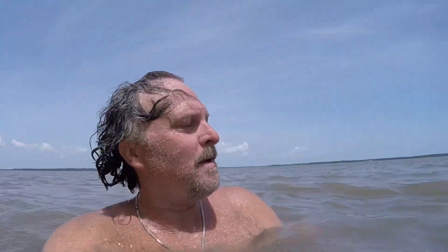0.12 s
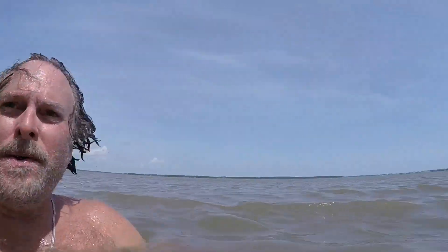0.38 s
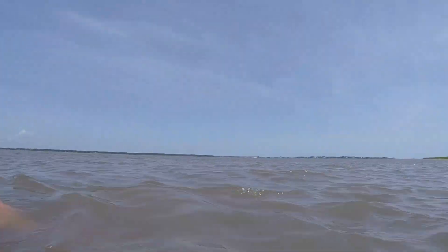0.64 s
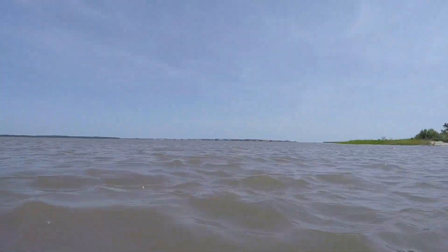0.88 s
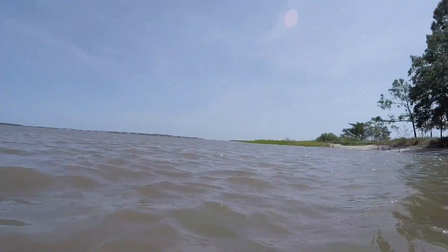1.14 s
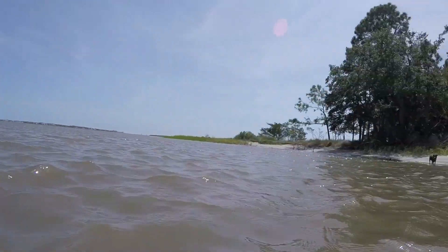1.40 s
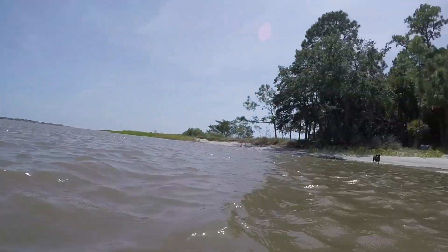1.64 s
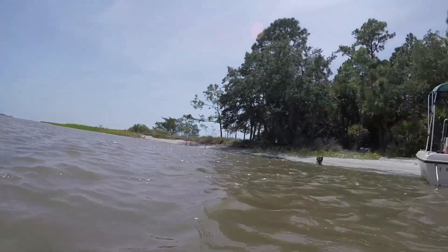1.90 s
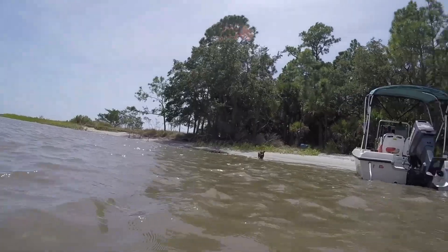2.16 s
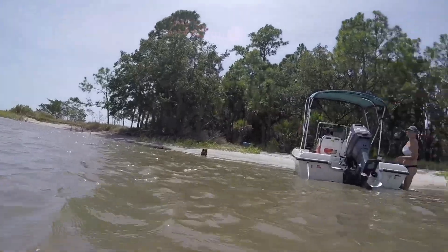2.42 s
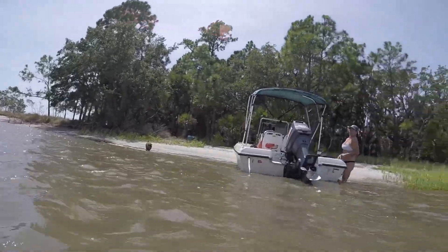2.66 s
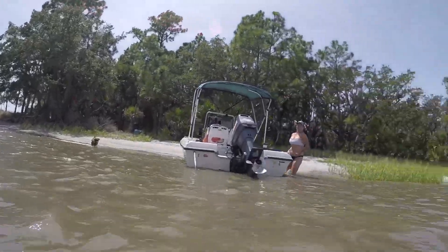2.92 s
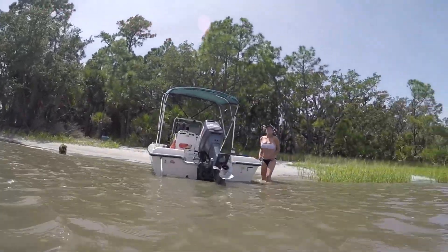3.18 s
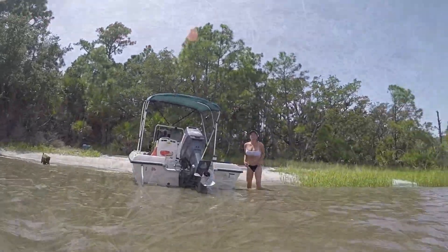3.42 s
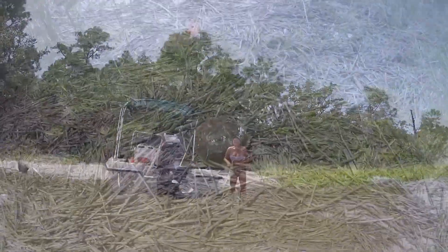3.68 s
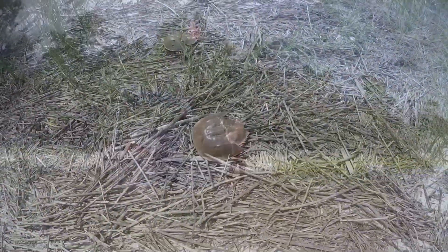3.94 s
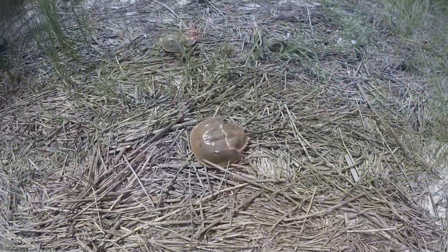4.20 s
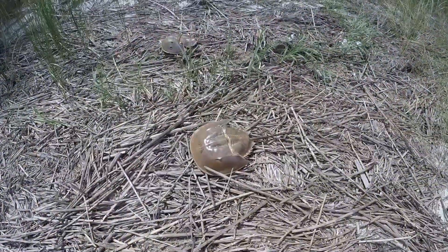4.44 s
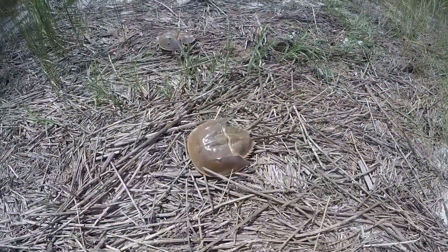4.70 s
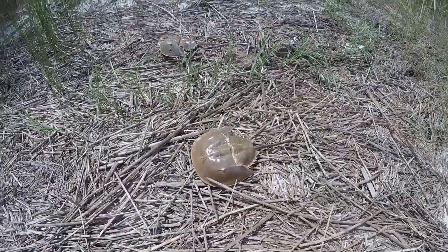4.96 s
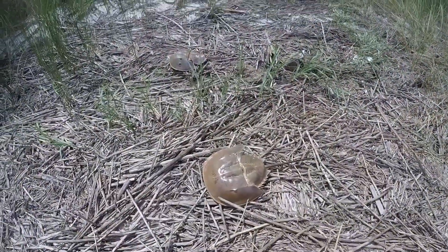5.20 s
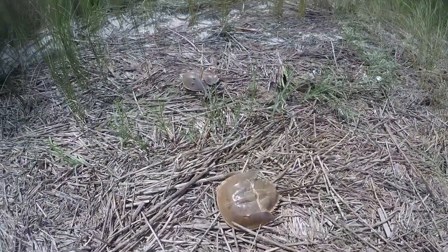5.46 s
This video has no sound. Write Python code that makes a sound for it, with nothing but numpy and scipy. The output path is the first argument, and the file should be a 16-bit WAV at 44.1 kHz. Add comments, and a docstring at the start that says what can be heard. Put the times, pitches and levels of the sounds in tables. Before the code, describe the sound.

A camera in a closed plastic case is held just above shallow water on a breezy shore. Two hard knocks and a small splash come early, then drops plink over grainy lapping while an insect chirps rapidly. Wind rumble swells in the middle, with another heavy knock just after three seconds and more drips. After a sharp click at about four seconds, water and insect drop away, leaving faint hiss and soft low rumble.

```python
"""A breezy shore: a small camera in a closed plastic case is hand-held over shallow water.
Wind rumble and flutter are resonant noise; fingers knock the case (ringing modes) and shove the
diaphragm (filtered pulses); cracks and small bright ticks are brief rough noises. Splashes, soft low
bursts and faint whistles are swells of filtered noise; drops are gliding plinks with spatter. An insect
chirps in gated noise bands on the bank, and lapping water is a grainy wash of coloured noise."""
import sys
import numpy as np
from scipy import signal
from scipy.fft import rfft, irfft, next_fast_len
from scipy.io import wavfile
from scipy.ndimage import uniform_filter1d

SR = 44100
rng = np.random.default_rng(int(sys.argv[2]) if len(sys.argv) > 2 else 0)


def wav_out(sig):
    """Save sig, one row per channel (or a flat mono array), as 16-bit PCM at SR to the path in sys.argv[1]."""
    wavfile.write(sys.argv[1], SR, np.round(np.clip(np.atleast_2d(sig).T, -1, 1) * 32767).astype(np.int16))


def linear_from_db(decibels):
    """Turn decibels (scalar or array-like) into linear amplitude factors; 0 gives 1."""
    return 10 ** (np.asarray(decibels, float) / 20)


N = 246512


def level(x, db):
    """Scale to an rms level."""
    return x * linear_from_db(db) / np.sqrt(np.mean(x ** 2))


def curve(table):
    """Columns of a time table, interpolated to one value per sample."""
    time_s, *columns = np.transpose(table)
    return [np.interp(np.arange(N) / SR, time_s, column) for column in columns]


def coloured(points):
    """Noise with the spectrum given as (Hz, dB) points, rms 1."""
    hz, db = np.transpose(points)
    bins_hz = np.maximum(np.arange(N // 2 + 1) * SR / N, 1)
    gain_db = np.interp(np.log(bins_hz), np.log(hz), db, left=-90, right=-90)
    return level(irfft(rfft(rng.standard_normal(N)) * linear_from_db(gain_db), N), 0)


def band(x, hz, width_hz):
    """Two-pole resonance, gain 1 at the centre."""
    return signal.lfilter(*signal.iirpeak(min(hz, .45 * SR), hz / width_hz, fs=SR), x)


def low(x, hz):
    """Two-pole low-pass."""
    return signal.lfilter(*signal.butter(2, min(hz, .45 * SR), fs=SR), x)


def walk(rate_hz):
    """Random levels held 1 / rate_hz s and slewed twice; rms 1."""
    hold = int(SR / rate_hz)
    steps = np.repeat(rng.standard_normal(N // hold + 1), hold)
    return level(uniform_filter1d(uniform_filter1d(steps, hold), hold)[:N], 0)


def add(out, start_s, x):
    """Mix x into out from start_s on."""
    i = max(int(start_s * SR), 0)
    out[i:i + len(x)] += x[:N - i]


def swell(middle_s, spread_s):
    """A bell-shaped rise and fall around middle_s: its first sample's time and its shape."""
    t = max(middle_s - .16, 0) + np.arange(SR // 3) / SR
    return t[0], np.exp(-.5 * ((t - middle_s) / spread_s) ** 2)


def bursts(table, widest_hz):
    """Swells of noise, each through one resonance no wider than its centre or widest_hz."""
    out = np.zeros(N)
    noises = rng.standard_normal((len(table), SR // 3))
    for (middle_s, spread_s, level_db, hz), noise in zip(table, noises):
        start_s, shape = swell(middle_s, spread_s)
        width_hz = min(hz, widest_hz)
        resonant = band(band(noise, hz, width_hz), hz, 2 * width_hz)
        add(out, start_s, shape * level(resonant, level_db))
    return out


def wind():
    """Eddies push the diaphragm to and fro at a wavering slow rate; gusty flutter rides above."""
    # wind on the microphone: time_s, rumble_gain_db, flutter_db
    wind_levels = [(0.0, -42, -54), (.14, -32, -53.5), (.43, -31, -59), (.65, -32.5, -71),
                   (1.0, -36.5, -67.5), (1.5, -34.5, -57), (1.78, -29.5, -55), (1.87, -22.5, -64),
                   (1.94, -28.5, -67), (2.0, -20.5, -71), (2.13, -41, -63), (2.29, -30, -59.5),
                   (2.5, -25, -59), (2.63, -27, -51), (2.68, -24.5, -56), (2.85, -30.5, -55),
                   (3.11, -26, -44.5), (3.22, -19.5, -46), (3.29, -29.5, -52), (3.38, -18, -59),
                   (3.45, -32.5, -54), (3.52, -23, -56), (3.59, -33, -66), (3.69, -27, -52),
                   (3.95, -36, -54), (4.3, -36.5, -59.5), (4.8, -35, -68), (5.1, -39.5, -59.5),
                   (5.59, -42, -64)]
    rumble_hz, rumble_width_hz, flutter_hz = 32.3, 14.9, 87
    buffet_db, buffets_per_s = 2.5, 20
    rumble_gain_db, flutter_db = curve(wind_levels)
    eddies = band(low(rng.standard_normal(N), 82.0), rumble_hz, rumble_width_hz)
    # the swing keeps a fairly even size, so that the gusts set its loudness
    size = np.abs(signal.hilbert(eddies, next_fast_len(N))[:N])
    evened = eddies / (size + 0.59 * size.mean()) ** 0.35
    rumble = level(linear_from_db(buffet_db * walk(buffets_per_s)) * evened, 0)
    gusts = linear_from_db(4 * walk(14))
    flutter = gusts * band(low(low(rng.standard_normal(N), 165), 260), flutter_hz, 50)
    return low(low(linear_from_db(rumble_gain_db) * rumble, 49.4), 152) + linear_from_db(flutter_db) * level(flutter, 0)


def shoves():
    """The vented diaphragm, a damped second-order high-pass, follows a push, then overshoots back."""
    # shoves that swing the diaphragm: start_s, gain_db, push time constant_s, signed factor
    pushes = [(0.2331, -32, 0.0018, -1.1), (0.264, -17.5, .0021, 0.82), (3.1361, -8.5, 0.00061, 1),
              (4.1239, -20.5, 0.0011, -1.1)]
    diaphragm_hz, diaphragm_damp = 45.3, 0.82
    out, t, w = np.zeros(N), np.arange(SR // 8) / SR, 2 * np.pi * diaphragm_hz
    vented = signal.bilinear([1, 0, 0], [1, diaphragm_damp * w, w * w], SR)
    for start_s, gain_db, rise_s, factor in pushes:
        push = (t / rise_s) ** 2 * np.exp(-t / rise_s)
        swing = signal.lfilter(*vented, push)
        add(out, start_s, factor * linear_from_db(gain_db) * swing / np.abs(swing).max())
    return out


def knocks():
    """A short blow rings the case's damped modes; the grip shortens the ring."""
    # modes of the free case: mode_hz, gain_db, t60_s
    modes = [(456, -12, 0.034), (607, -6.5, 0.054), (890, -5, 0.088), (1196, 3, 0.016), (1930, 2.5, 0.069),
             (2100, -2, 0.043), (2590, 3.5, 0.016), (2737, 3, 0.027), (2960, -12, 0.029),
             (4010, 1.5, 0.044), (4480, 1.5, 0.045), (5100, -22, .022), (6000, 3.5, .025),
             (6700, -5, 0.017), (7700, -6, .017)]
    # knocks and bounces: start_s, peak_db, contact_s, grip damping_per_s
    blows = [(0.2333, -26, 0.000027, 30), (0.2345, -14, 0.000096, 77), (0.2626, -17, 0.000062, 30),
             (0.2639, -5.5, 0.00011, 66), (0.2651, -8.5, 0.00033, 34), (3.1329, -18, 0.00024, 190),
             (3.134, -10, 0.00076, 100), (4.1236, -22, 0.000049, 49)]
    out, t = np.zeros(N), np.arange(SR // 8) / SR
    ring = sum(linear_from_db(db) * np.sin(2 * np.pi * hz * t) * 1000 ** (-t / t60_s) for hz, db, t60_s in modes)
    for start_s, peak_db, contact_s, grip_per_s in blows:
        # a softer finger pushes longer and wakes fewer high modes
        push = t ** 2 * np.exp(-2 * t / contact_s)
        body = signal.fftconvolve(push, ring * np.exp(-grip_per_s * t))[:len(t)]
        add(out, start_s, linear_from_db(peak_db) * body / np.abs(body).max())
    return out


def cracks_and_ticks():
    """Cracks and small bright ticks: brief rough noises that start at once and stop short."""
    # cracks and ticks: start_s, gain_db, centre_hz, length_s
    snaps = [(0.2323, -31, 4520, 0.0024), (.2627, -25.5, 4000, 0.0023), (.6404, -52, 10000, .0015),
             (1.685, -48, 9000, 0.0017), (3.1332, -22.5, 2310, 0.0025), (3.2472, -43.5, 5700, 0.0028),
             (4.0, -57.5, 5800, 0.0044), (4.1151, -31.5, 2100, 0.0026), (4.1257, -15.5, 2680, 0.0015),
             (4.1232, -20, 5100, 0.002), (4.1238, -23.5, 9700, 0.0013)]
    out, t = np.zeros(N), np.arange(SR // 50) / SR
    noises = rng.standard_normal((len(snaps), 2 * len(t)))
    for (start_s, gain_db, hz, length_s), noise in zip(snaps, noises):
        rough = band(noise, hz, 0.22 * hz)[len(t):]  # past the filter's build-up
        snap = np.tanh(2 * level(rough, 0)) * np.exp(-(t / length_s) ** 2)
        add(out, start_s, linear_from_db(gain_db) * low(low(snap, 2.06 * hz), 2.06 * hz))
    return out


def splashes():
    """A swell of dense spray: a core at the case's port, a duller slosh and a fine fizz."""
    # splashes: middle_s, spread_s, gain_db, top_hz
    sprays = [(.291, 0.02, -43, 6400), (1.794, .01, -51.5, 7500), (2.671, 0.015, -56.5, 5100),
              (3.371, .011, -49.5, 14900), (3.521, 0.0078, -58.5, 4100), (3.83, 0.014, -54.5, 12500),
              (3.841, .013, -44, 4830), (3.963, 0.0084, -47.5, 5530), (4.011, 0.0081, -58, 4100)]
    slosh_db, fizz_db = -5, -4  # relative to the core
    out = np.zeros(N)
    noises = rng.standard_normal((len(sprays), 4, SR // 3))
    for (middle_s, spread_s, gain_db, top_hz), noise in zip(sprays, noises):
        start_s, shape = swell(middle_s, spread_s)
        grain = linear_from_db(3 * level(low(noise[3], 400), 0))
        core = level(band(band(noise[0], 2050, 460), 2590, 1100), 0)
        slosh = level(band(noise[1], 870, 1050), slosh_db)
        fizz = level(band(noise[2], 2800, 4600), fizz_db)
        spray = level(grain, 0) * (core + slosh + fizz)
        add(out, start_s, linear_from_db(gain_db) * shape * low(low(spray, top_hz), top_hz))
    return out


def drops():
    """A drop on the case gives a short plink that glides up, and a noisy spatter."""
    # drops: start_s, gain_db, starting pitch_hz, spatter_db relative to gain, spatter_hz
    plinks = [(0.468, -48, 3020, -4, 3090), (0.587, -44, 2800, 0, 1500), (0.6393, -33, 2110, -10.5, 3370),
              (1.0998, -57, 1150, 7, 3040), (1.6594, -46, 2100, -7, 3430), (1.6859, -39, 2030, -5.5, 2880),
              (1.7534, -47, 2100, -9, 3370), (1.9031, -47, 1760, -8, 3030), (1.955, -55, 1080, 4, 4130),
              (2.135, -38.5, 1960, -26, 4720), (2.6582, -39.5, 2100, -21, 3510),
              (2.854, -48, 1360, -7, 4490), (2.9776, -43, 2050, -15, 3860), (3.247, -40, 2350, 1.5, 2580),
              (3.481, -46, 2430, -7, 6330), (3.549, -41, 2280, -26, 2980), (3.636, -34.5, 2270, -13, 2760),
              (3.659, -34.5, 2230, -8, 2740), (3.687, -47, 2200, -1, 1190), (3.802, -45.5, 1160, 0, 2100),
              (3.925, -51, 2170, -2, 3500)]
    t60_s = 0.023
    out, t = np.zeros(N), np.arange(SR // 25) / SR
    fade = np.minimum(t / 0.0015, 1) ** 2 * 1000 ** (-t / t60_s)
    noises = rng.standard_normal((len(plinks), len(t)))
    for (start_s, gain_db, pitch_hz, spatter_db, spatter_hz), noise in zip(plinks, noises):
        wet = band(band(noise, spatter_hz, 0.32 * spatter_hz), spatter_hz, 1.3 * spatter_hz)
        plink = np.sin(2 * np.pi * pitch_hz * t * (1 + 4 * t))
        add(out, start_s, linear_from_db(gain_db) * fade * (plink + level(wet, spatter_db)))
    return out


def insect():
    """Each chirp is a few wing strokes that rasp in four bands, each chirp in its own balance."""
    # rasp of the wings: centre_hz, width_hz, level_db
    wings = [(6400, 720, -15), (7330, 630, -16.5), (8130, 610, -20), (9000, 750, -21.5)]
    # the song as the camera turns: time_s, gain_db, extra gain of the lowest band_db
    song = [(0, -58, 2), (.3, -49.5, -4), (.55, -58.5, 2), (.75, -50, -6), (1.1, -63.5, 1),
            (1.6, -53.5, -5), (1.9, -59, 0), (2.25, -52, -14), (2.55, -51.5, -3), (2.75, -55, -3),
            (3.0, -51.5, 4), (3.35, -50, 7.5), (3.65, -54.5, 5), (3.9, -66, 6)]
    # even runs of chirps, the beat shifting between them: start_s
    runs_s = [.008, .105, .861, 1.621, 2.043, 2.586, 3.016, 3.341, 3.461]
    song_end_s, chirp_gap_s, chirp_s = 3.95, .1103, 0.047
    stroke_hz, scatter_spread_db = 96, 3.5
    gates, (song_db, lower_db) = np.zeros((len(wings), N)), curve(song)
    t = np.arange(int(chirp_s * SR)) / SR
    strokes = np.abs(np.sin(np.pi * stroke_hz * t)) ** .6
    gate = signal.windows.tukey(len(t), .2) * strokes
    ends_s = list(runs_s[1:]) + [song_end_s]
    starts_s = np.concatenate([np.arange(first_s, end_s - chirp_gap_s / 2, chirp_gap_s)
                               for first_s, end_s in zip(runs_s, ends_s)])
    scatters_db = scatter_spread_db * rng.standard_normal((len(starts_s), len(wings)))
    for start_s, scatter_db in zip(starts_s, scatters_db):
        i = int(start_s * SR)
        for row, db in zip(gates, song_db[i] + scatter_db + (lower_db[i], 0, 0, 0)):
            add(row, start_s, gate * linear_from_db(db))
    rasp = [level(band(band(band(rng.standard_normal(N), hz, width_hz), hz, width_hz), hz, 2 * width_hz), db)
            for hz, width_hz, db in wings]
    return (gates * rasp).sum(axis=0)


def soft_bursts():
    """Low thuds and gurgles: brief soft bursts, each in one band, from wind buffets, handling or water."""
    # soft bursts: middle_s, spread_s, level_db, centre_hz
    thuds = [(.105, 0.0099, -60, 580), (.145, 0.0053, -44, 126), (1.692, 0.0077, -60, 198),
             (2.551, 0.019, -57.5, 247), (2.675, 0.0089, -52, 303), (2.86, 0.0093, -52, 290),
             (2.979, 0.011, -53.5, 198), (3.138, 0.0026, -37, 493), (3.146, 0.0094, -50, 870),
             (3.376, 0.021, -54.5, 275), (3.441, 0.023, -61, 358), (3.52, 0.013, -57.5, 357),
             (3.72, 0.016, -48, 360), (3.85, 0.018, -64, 480), (3.963, 0.0077, -52.5, 990),
             (4.451, 0.0072, -63, 200), (4.73, 0.009, -56, 147), (5.171, 0.011, -54.5, 115)]
    return bursts(thuds, widest_hz=190)


def whistles():
    """A narrow band of air noise swells and fades, faint and breathy."""
    # whistles: middle_s, spread_s, level_db, centre_hz
    breaths = [(.05, 0.067, -58.5, 1894), (5.03, 0.011, -66.5, 1100), (5.18, 0.067, -68.5, 1440)]
    return bursts(breaths, widest_hz=120)


def wash():
    """Countless small ripples merge into a grainy wash, coloured by the case."""
    # lapping water all around: time_s, level_db
    wash_levels = [(0.0, -60), (0.47, -58.5), (0.86, -64.5), (1.17, -61.5), (1.6, -65), (2.33, -60.5),
                   (2.9, -62.5), (3.33, -58), (3.78, -65.5), (4.09, -76), (4.7, -84), (4.93, -72.5),
                   (5.59, -91)]
    # spectrum of the wash: frequency_hz, density_db
    wash_colour = [(300, -2), (600, -6), (1100, -3.5), (1500, -3.5), (1900, 2), (2300, 0.5), (3000, -12),
                   (4200, -11.5), (6000, -14.5), (9000, -24)]
    grain = linear_from_db(walk(30) + 1.5 * walk(150))
    return linear_from_db(curve(wash_levels)[0]) * level(grain * coloured(wash_colour), 0)


def scene():
    """Everything reaches the one microphone."""
    brief = shoves() + knocks() + cracks_and_ticks() + soft_bursts()
    water = splashes() + drops() + wash()
    return (wind() + brief + water + insect() + whistles())[None]


def low_pass(x):
    """Removes everything above the highest recorded frequency."""
    return signal.sosfilt(signal.butter(12, 16540, fs=SR, output="sos"), x)


def record(dry):
    """The microphone cuts the top; the preamplifier adds its hiss."""
    # spectrum of the hiss: frequency_hz, density_db
    hiss_colour = [(100, -7), (160, 1), (300, -4), (600, -9.5), (1200, -12), (2500, -12.5), (5000, -16),
                   (9000, -21), (13500, -23), (15200, -29), (16000, -48)]
    mic_top_hz, hiss_db = 15300, -64
    heard = signal.sosfilt(signal.ellip(8, .2, 50, mic_top_hz, fs=SR, output="sos"), dry)
    return low_pass(heard + level(coloured(hiss_colour), hiss_db))


dry = scene()
out = record(dry)
wav_out(out)
```